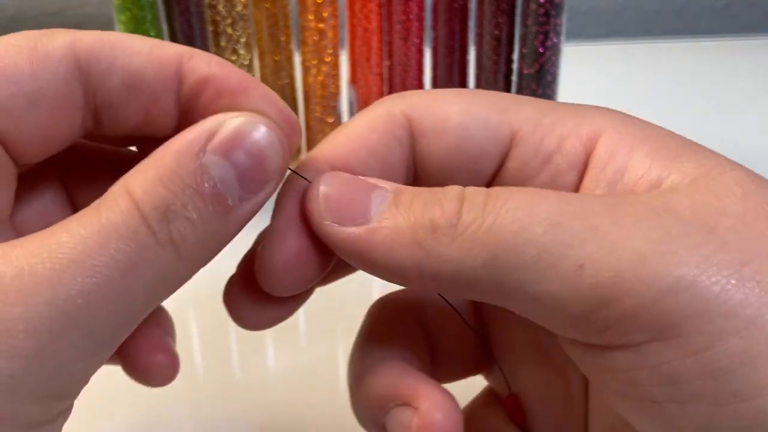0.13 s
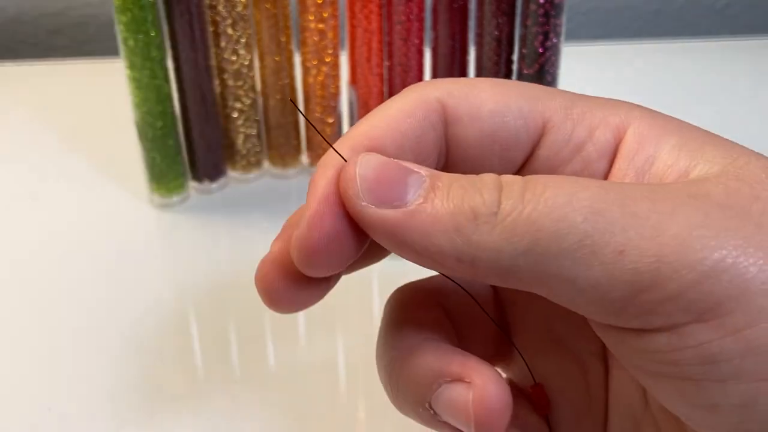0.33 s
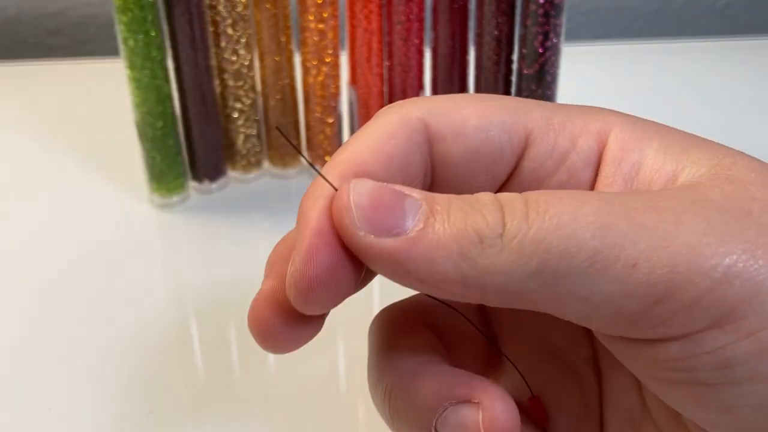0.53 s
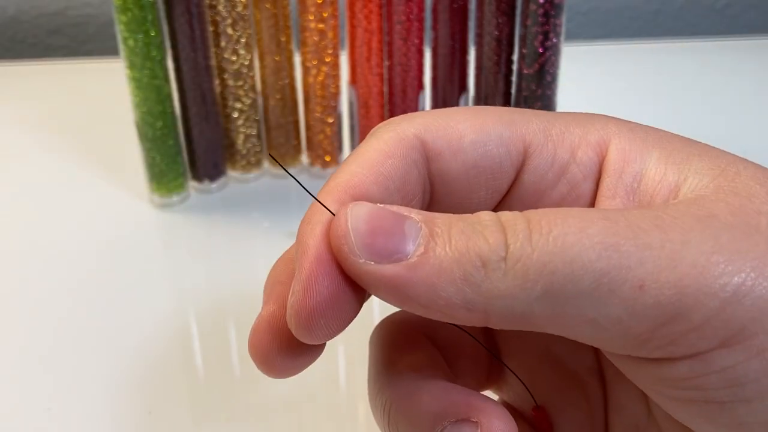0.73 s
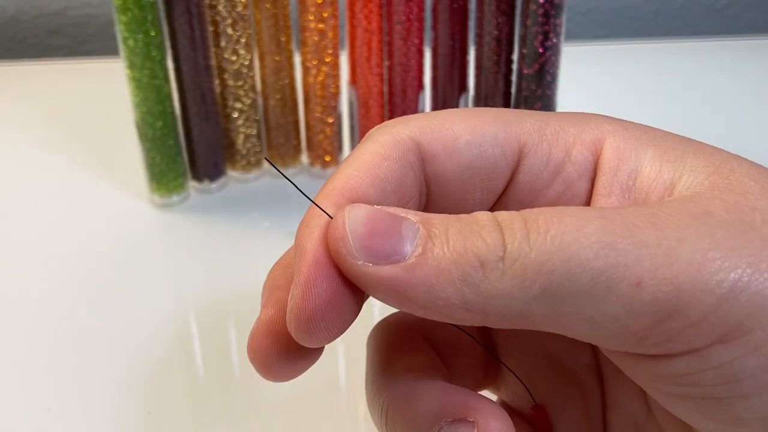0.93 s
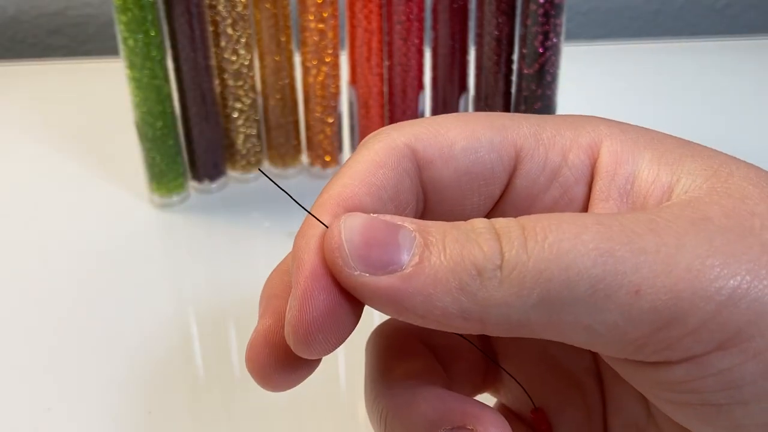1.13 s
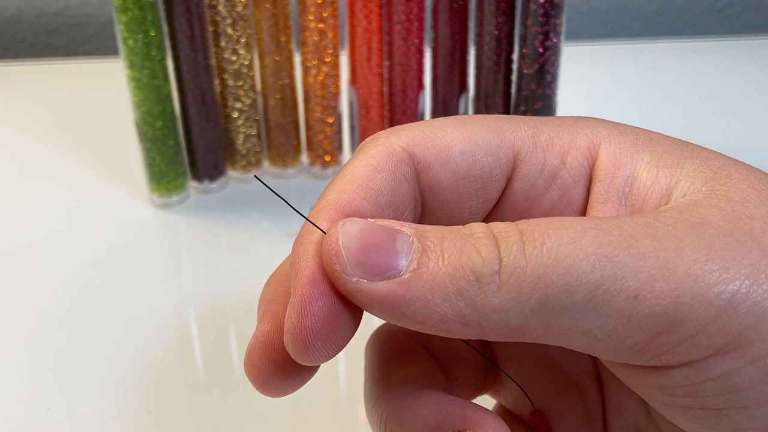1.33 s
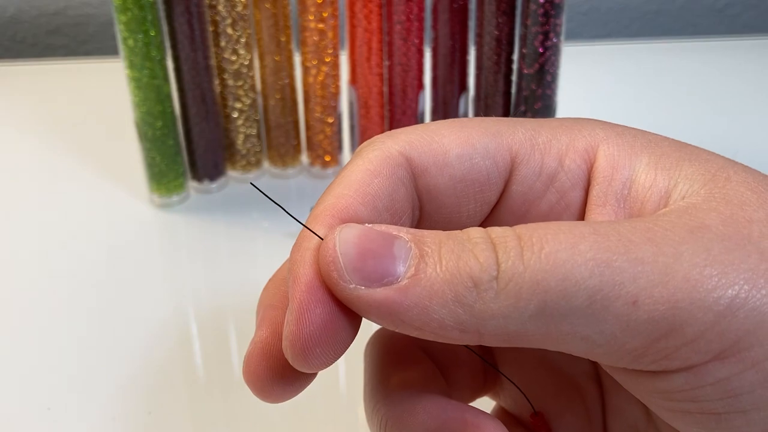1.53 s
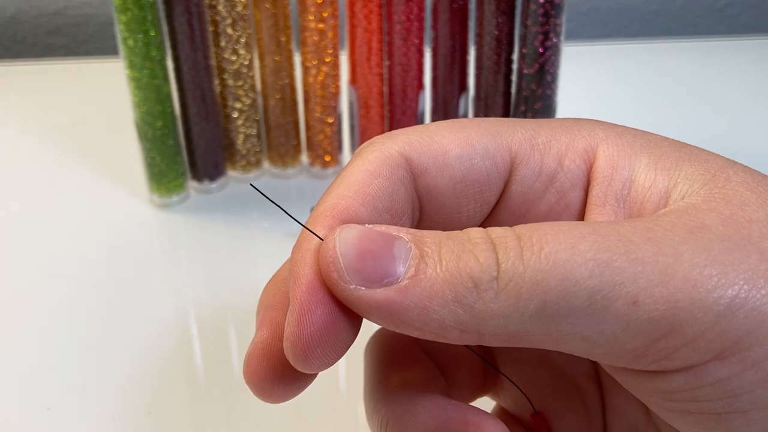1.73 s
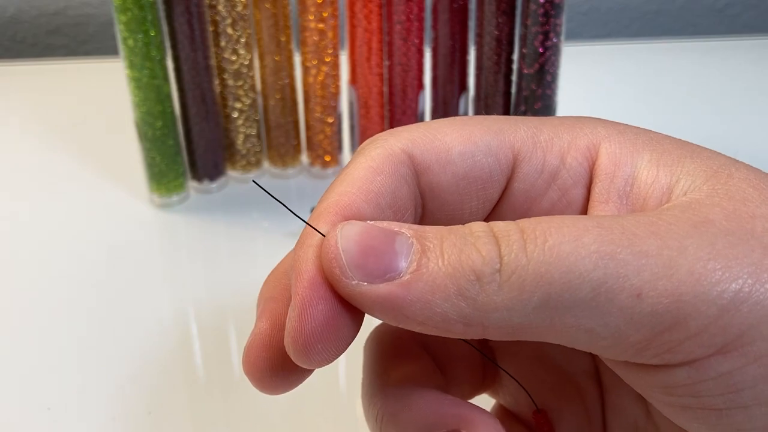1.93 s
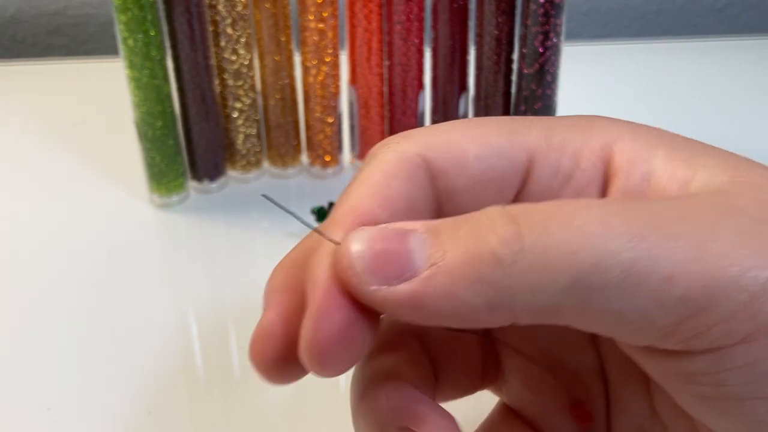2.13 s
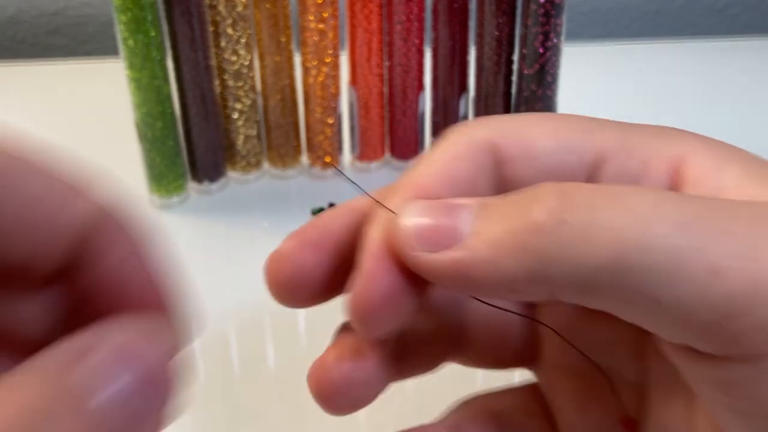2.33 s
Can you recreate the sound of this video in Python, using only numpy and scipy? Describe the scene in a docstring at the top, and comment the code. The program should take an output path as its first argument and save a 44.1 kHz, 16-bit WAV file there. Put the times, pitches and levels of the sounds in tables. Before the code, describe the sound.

Small glass beads clicking and sliding in a plastic tube, with skin brushing and table knocks.

```python
"""Small glass seed beads tick, slide and rattle in a plastic tube that is picked up, tapped and set down.
Each tick is a dry crack with a trace of glassy ring; sliding beads make a grainy fizz. Knocks ring the
tube and thump the table top. Skin brushes and catches on skin, a hand or the tube drags on the table,
and a quiet room hums. Two microphone ports share the bass; the left treble is delayed and inverted."""
import sys
import numpy as np
from scipy import signal
from scipy.fft import rfft, irfft, next_fast_len
from scipy.io import wavfile
from scipy.ndimage import uniform_filter1d

SR = 44100
rng = np.random.default_rng(int(sys.argv[2]) if len(sys.argv) > 2 else 0)


def to_wav(sig):
    """Store sig (one row per channel, or 1-D mono) as 16-bit WAV at the path in sys.argv[1].

    Samples outside -1..1 are clipped; the rate is SR.
    """
    pcm = np.clip(np.atleast_2d(sig), -1, 1) * 32767
    pcm = np.round(pcm).astype(np.int16)
    wavfile.write(sys.argv[1], SR, pcm.T)  # frames by channels


N = 108882
T = np.arange(N) / SR

# Colour of the room tone: (frequency [Hz], level [dB])
AIR_SPECTRUM = [(20, -11), (40, -6), (64, 0), (150, -17.5), (250, -19.5), (400, -21), (550, -27),
                (830, -28), (950, -28.5), (3000, -37), (6000, -41.5), (9000, -35), (16000, -49.5)]
# Reverb decay: (frequency [Hz], t60 [s])
ROOM_DECAY = [(200, 0.16), (2000, 0.19), (10000, 0.16)]
# Envelopes of low rubbing: two for the low body of the opening skin swish, then two drags on the table:
# (time [s], level [dB])
RUB_STROKES = [
    [(0.0, -76), (0.08, -72), (0.16, -84)],
    [(0.27, -82), (0.36, -69.5), (0.45, -74), (0.52, -90)],
    [(1.73, -93), (1.76, -81), (1.79, -66.5), (1.85, -51), (1.875, -64), (1.9, -102)],
    [(2.22, -91), (2.27, -58), (2.3, -42.5), (2.32, -40.5)],
]
# Colour of the low rubbing: (frequency [Hz], level [dB])
RUB_SPECTRUM = [(90, -42.5), (150, -2.5), (400, -9.5), (1000, -9), (2200, -16.5), (2900, -26.5),
                (5000, -27), (9000, -42)]
# One curve per skin stroke; only the first gets hiss:
# (time [s], level [dB], hiss offset [dB], centre [Hz], width [octaves])
SKIN_STROKES = [
    [(0.0, -51.5, -13.5, 2037, 0.63), (0.018, -55.5, 1, 2060, 0.57), (0.078, -54, -6.5, 2380, 0.74),
     (0.172, -67, -19.5, 1860, 0.36), (0.222, -64.5, -25, 1830, 0.38), (0.26, -74, 7.5, 2310, 0.34),
     (0.288, -55.5, 1.5, 2670, 0.52), (0.33, -51.5, 3, 1970, 0.56), (0.408, -46.5, -11, 2260, 1),
     (0.488, -62, 1, 1670, 1), (0.548, -100, 6, 1790, 0.12), (0.6, -96, 5, 2260, 0.62)],
    [(1.6, -100, 32, 3370, 0.5), (1.612, -88, 33, 3280, 0.59), (1.628, -68.5, 20, 3280, 0.76),
     (1.662, -76, 17, 2430, 1), (1.7, -114, 24, 2040, 0.45)],
    [(2.36, -84, -3, 1945, 0.63), (2.404, -66, 13, 1760, 1), (2.426, -58.5, -14, 2680, 0.94),
     (2.436, -54.5, 9, 3220, 1), (2.469, -50, 9, 3330, 0.94)],
]
# Colour of the skin hiss: (frequency [Hz], level [dB])
SKIN_HISS_SPECTRUM = [(2500, -37), (4000, -9.5), (6500, -2), (10000, 2), (12500, -1.5), (16000, -6.5)]
# Skin catching: (time [s], length [s], level [dB], centre [Hz], width [Hz])
SKIN_SQUEAKS = [(1.01, 0.091, -72, 2640, 510), (1.932, 0.055, -52.5, 3600, 180),
                (1.932, 0.028, -54.5, 4800, 320), (0.273, 0.23, -54.5, 1534, 58),
                (0.425, 0.11, -67.5, 1700, 69), (0.287, 0.14, -57.5, 1800, 52),
                (0.27, 0.2, -61.5, 2800, 58), (0.0, 0.14, -66, 3200, 190), (1.62, 0.058, -71, 1830, 470)]
# Table top modes: (frequency [Hz], level [dB], t60 [s])
TABLE_MODES = [(63.95, -6, 0.24), (81.4, -13, 0.15), (91.7, -1.5, 0.2), (107.4, -0.5, 0.16),
               (140.7, -3.5, 0.16), (213.5, -6, 0.23), (294.7, -3.5, 0.13), (349.2, 9.5, 0.061),
               (380, 0, 0.053), (516.3, -2.5, 0.051)]
# Plastic tube modes: (frequency [Hz], level [dB])
TUBE_MODES = [(560, -6.5), (775, -1.5), (915, -8.5), (1134, -0.5), (1540, 6), (1710, 0.5), (1830, 4),
              (2010, 1.5), (2260, -1.5), (2580, -11.5), (3280, 6.5), (3540, -8), (4060, -0.5), (4920, -9.5)]
# Blows on tube and table: (time [s], tube level [dB], tube centre [Hz], tube width [Hz],
# tube noise t60 [s], table level [dB], table bass tilt [dB per octave down], table rise [s])
KNOCK_HITS = [(1.4022, -18, 1140, 167, 0.047, -58, -5.5, 0.012),
              (1.406, -35, 670, 515, 0.12, -71, -7, 0.0057),
              (1.447, -50, 1150, 600, 0.056, -80, -12, 0.004),
              (1.783, -57, 700, 700, 0.054, -54.5, 1, 0.0061),
              (1.808, -44, 1776, 1180, 0.1, -60.5, -12, 0.0018),
              (1.933, -39.5, 2800, 3000, 0.45, -63, -9.5, 0.018),
              (1.948, -45.5, 650, 400, 0.061, -63, -4, 0.006),
              (1.964, -31, 700, 900, 0.12, -46, -15.5, 0.0046),
              (1.971, -11, 1830, 2500, 0.076, -29, -5, 0.004),
              (1.979, -12.5, 700, 800, 0.053, -38.5, -14.5, 0.0015),
              (2.016, -34, 900, 1200, 0.033, -50.5, -5, 0.0068),
              (2.304, -8, 1400, 1360, 0.049, -24, -1, 0.00925),
              (2.3072, -15.5, 1520, 1000, 0.021, -18.5, -3, 0.0035),
              (2.3135, -23, 1540, 1520, 0.047, -36.5, -1, 0.0022),
              (2.323, -68, 800, 800, 0.1, -30, 7.5, 0.0042)]
# Resonances of the bead-filled tube: (frequency [Hz], level [dB], t60 [s])
GLASS_MODES = [(3560, -2, .05), (4720, 6, 0.026), (6620, -11.5, 0.012), (7360, -4.5, 0.021),
               (8010, -5.5, 0.18), (10030, -0.5, 0.043), (11530, -9.5, .04), (12370, 2.5, 0.041),
               (14100, 0, 0.033)]
# Envelope of the sliding beads: (time [s], level [dB])
SLIDE_ENVELOPES = [
    [(1.34, -101), (1.375, -60), (1.41, -52.5), (1.45, -100), (1.49, -61.5), (1.54, -57.5), (1.6, -61.5),
     (1.63, -46.5), (1.66, -64.5), (1.69, -79), (1.76, -85), (1.82, -82), (1.9, -89), (1.93, -56.5),
     (1.96, -90), (1.975, -34), (2.03, -37.5), (2.06, -50.5), (2.12, -61.5), (2.135, -72), (2.19, -58),
     (2.24, -69), (2.3, -54.5), (2.36, -56.5), (2.42, -43), (2.47, -44)],
]
# Colour of their fizz: (frequency [Hz], level [dB])
SLIDE_SPECTRUM = [(3000, -36), (5400, -22), (6500, -4), (7700, 0), (10000, -3), (12500, -3), (16000, -6)]
# Bead impacts: (time [s], level [dB], crack t60 [s], centre [Hz])
BEAD_TICKS = [(0.2117, -28, 0.0055, 12500), (0.9045, -40, 0.029, 10200), (1.1187, -46, 0.023, 11200),
              (1.3745, -67, 0.026, 8400), (1.4057, -26, 0.06, 8700), (1.413, -18.5, 0.026, 10200),
              (1.4152, -22, 0.031, 10700), (1.42, -52, 0.022, 9380), (1.4225, -33, 0.016, 8600),
              (1.543, -44, 0.075, 10800), (1.561, -30.5, 0.012, 11100), (1.5736, -42, 0.015, 9400),
              (1.5872, -26, 0.019, 10400), (1.627, -57, 0.042, 7500), (1.641, -34.5, 0.044, 7600),
              (1.717, -47.5, 0.04, 8150), (1.7847, -50, 0.033, 7360), (1.8072, -29.5, .025, 4760),
              (1.9668, -23, 0.27, 7000), (1.9705, -2.5, 0.0155, 5150), (1.9711, 1.5, 0.0094, 11110),
              (1.972, -4, 0.024, 5560), (1.994, -11, 0.068, 11000), (1.999, -6.5, 0.022, 9000),
              (2.006, -10, 0.042, 11000), (2.0298, -17.5, 0.053, 11400), (2.062, -26, 0.035, 9100),
              (2.087, -16, 0.027, 9170), (2.1027, -23, 0.036, 9740), (2.108, -24.5, 0.018, 9770),
              (2.1105, -37.5, 0.027, 10500), (2.139, -48, .015, 10600), (2.1534, -29, 0.039, 10300),
              (2.1546, -20.5, 0.024, 11400), (2.156, -30.5, 0.012, 11000), (2.1774, -34.5, .03, 11500),
              (2.1785, -30.5, 0.024, 12400), (2.3073, -39, 0.017, 3520)]


def amp(db):
    """dB to gain."""
    return 10 ** (np.asarray(db) / 20)


def unit(x):
    """Normalise to rms 1."""
    return x / np.sqrt(np.mean(x ** 2) + 1e-20)


def along(points, hz):
    """Read a (frequency, value) curve on a log frequency axis."""
    f, v = np.transpose(points)
    return np.interp(np.log(hz + 1), np.log(f + 1), v)


def peak(f, hz, width_hz):
    """Response at f of one resonance centred on hz."""
    return 1j * f * width_hz / (hz ** 2 - f * f + 1j * f * width_hz)


def filtered(x, response):
    """EQ x with a complex frequency response."""
    m = next_fast_len(x.shape[-1] + 8192)
    return irfft(rfft(x, m) * response(np.fft.rfftfreq(m, 1 / SR)), m)[..., :x.shape[-1]]


def fader(strokes, db_cols=(1,)):
    """Gain ride from the strokes' summed dB columns, silent between strokes."""
    return sum(amp(np.interp(T, rows[:, 0], rows[:, db_cols].sum(1), left=-120, right=-120))
               for rows in map(np.array, strokes))


def grit(spectrum, grainy_db, grain_s):
    """Stereo noise of rms 1, roughened by tiny uneven grains."""
    grains = uniform_filter1d(rng.exponential(size=N), max(1, int(grain_s * SR)))
    noise = rng.standard_normal((2, N)) * amp(grainy_db * unit(grains - grains.mean()))
    return unit(filtered(noise, lambda f: amp(along(spectrum, f)) * (f > spectrum[0][0])))


def ring(hz, db, t60, t, spread_db):
    """Damped modes, with their own level and phase at each port."""
    level = db[:, None] + spread_db * rng.standard_normal((2, len(hz), 1)) - 60 * t / t60[:, None]
    cycles = hz[:, None] * t + rng.random((2, len(hz), 1))
    return (amp(level) * np.sin(2 * np.pi * cycles)).sum(1)


def add(track, start_s, sound):
    """Mix a sound in at start_s."""
    i = round(start_s * SR)
    track[:, i:i + sound.shape[1]] += sound[:, :N - i]


def room_tone(hum_hz=60.6, hum_width_hz=5.3, tone_hz=830):
    """The bed: soft air, a fuzzy mains hum and a faint steady tone."""
    air = grit(AIR_SPECTRUM, grainy_db=0.4, grain_s=0.03)
    hum = unit(filtered(rng.standard_normal(N), lambda f: 1 / (1 + ((f - hum_hz) / hum_width_hz) ** 2)))
    return amp(-69.5) * air + amp(-64) * hum + amp(-90.5) * np.sin(2 * np.pi * tone_hz * T)


def room_reverb(x):
    """A short room tail in which each frequency dies at its own speed."""
    hz, t, spectra = signal.stft(rng.standard_normal((2, SR // 3)), SR, nperseg=256)
    decay = amp(-60 * t / along(ROOM_DECAY, hz)[:, None])
    tail = signal.istft(spectra * decay, SR, nperseg=256)[1]
    predelayed = np.pad(x, ((0, 0), (300, 0)))
    return signal.fftconvolve(predelayed, tail / np.linalg.norm(tail[0]), axes=1)[:, :N]


def low_rub():
    """Low, grainy friction: the body of the opening skin swish, then hand or tube dragging on the table."""
    return fader(RUB_STROKES) * grit(RUB_SPECTRUM, grainy_db=2, grain_s=0.004)


def skin_brush(patchy_db=2.0):
    """Skin on skin: patchy friction noise in a sweeping band, with hiss on the first stroke."""
    times, _, _, centres, widths = np.concatenate(SKIN_STROKES).T
    hz, t, spectra = signal.stft(rng.standard_normal((2, N)), SR, nperseg=512)
    offset = np.log2((hz[:, None] + 1) / np.interp(t, times, centres)) / np.interp(t, times, widths)
    band = np.exp(-(offset * np.where(offset < 0, 1.4, 1)) ** 2 / 2)  # steeper on the low side
    patches = uniform_filter1d(rng.standard_normal(spectra.shape[1:]), size=9, axis=1)
    gain = amp(patchy_db * unit(patches)) * band
    gain /= np.sqrt(np.mean(gain ** 2, axis=0))  # level holds through the sweep
    body = signal.istft(spectra * gain, SR, nperseg=512)[1][:, :N]
    hiss = grit(SKIN_HISS_SPECTRUM, grainy_db=0.5, grain_s=0.0027)
    return fader(SKIN_STROKES) * body + fader(SKIN_STROKES[:1], db_cols=(1, 2)) * hiss


def skin_squeaks():
    """Skin catches briefly, and one fuzzy resonance swells and fades."""
    out = np.zeros((2, N))
    for start, length, db, hz, width_hz in SKIN_SQUEAKS:
        band = unit(filtered(rng.standard_normal((2, N)), lambda f: peak(f, hz, width_hz) ** 2))
        out += amp(db) * band * np.sin(np.pi * np.clip((T - start) / length, 0, 1))
    return out


def knocks():
    """A blow rings the plastic tube around its centre pitch and thumps the table top."""
    out, t = np.zeros((2, N)), np.arange(SR // 2) / SR
    mode_hz, mode_db = np.transpose(TUBE_MODES)
    for start, tube_db, centre_hz, width_hz, t60, table_db, tilt_db, rise in KNOCK_HITS:
        modes = ring(mode_hz, mode_db, 0.6 * t60 * np.sqrt(1000 / mode_hz), t, spread_db=3)
        clack = amp(-60 * t / t60) * rng.standard_normal((2, len(t)))
        band = lambda f: peak(f, centre_hz, width_hz) * peak(f, centre_hz, 3 * width_hz)
        tube = filtered(0.35 * modes + clack, band)
        tube *= 1 - np.exp(-t / (0.27 * rise))  # the tube speaks faster than the table
        thump = sum(amp(db + tilt_db * np.log2(350 / hz) - 60 * t / decay) * np.sin(2 * np.pi * hz * t)
                    for hz, db, decay in TABLE_MODES)
        thump *= 1 - np.exp(-(t / rise) ** 2)
        add(out, start, amp(tube_db) * tube + amp(table_db) * thump)
    return out


def glassy(x, spread_db, direct=1.23, colour=1.3):
    """Colour x with the resonances of the bead-filled tube, each at a randomised level."""
    gains = colour * amp(spread_db * rng.standard_normal(len(GLASS_MODES)))
    return filtered(x, lambda f: direct + sum(gain * amp(db) * peak(f, hz, width_hz=350)
                                              for gain, (hz, db, _) in zip(gains, GLASS_MODES)))


def bead_slide():
    """Beads sliding in the tube blur into a glassy fizz."""
    fizz = grit(SLIDE_SPECTRUM, grainy_db=2.5, grain_s=0.002)
    return fader(SLIDE_ENVELOPES) * unit(glassy(fizz, spread_db=1))


def bead_ticks(rise_s=0.00024, ring_db=-27):
    """Each bead impact is a dry crack with a trace of glassy ring, band-passed around its centre."""
    out, t = np.zeros((2, N)), np.arange(SR // 8) / SR
    mode_hz, mode_db, mode_t60 = np.transpose(GLASS_MODES)
    for start, db, t60, centre_hz in BEAD_TICKS:
        envelope = amp(-60 * t / t60) * (1 - np.exp(-t / rise_s))
        crack = glassy(envelope * rng.standard_normal((2, len(t))), spread_db=4)
        tick = crack + amp(ring_db) * ring(mode_hz, mode_db, mode_t60, t, spread_db=3)
        low_cut = lambda f: (1j * f / (0.5 * centre_hz + 1j * f)) ** 6
        high_cut = lambda f: 1 / (1 + 1j * f / (2 * centre_hz)) ** 4
        band = lambda f: peak(f, centre_hz, 1.3 * centre_hz) ** 2 * low_cut(f) * high_cut(f)
        add(out, start, amp(db) * filtered(tick, band))
    return out


def scene():
    """Beads, knocks and hands up close, with a little reverb over the room tone."""
    close = bead_ticks() + bead_slide() + knocks() + low_rub() + skin_brush() + skin_squeaks()
    return close + amp(-9) * room_reverb(close) + room_tone()


def record(dry, bass_lead_s=0.0005, treble_lag_s=1 / 4600):
    """Two ports: shared bass with the left early, separate mids, shared treble with the left late."""
    bass = lambda f: 1 / (1 + (f / 900) ** 4)  # share of the power
    treble = lambda f: np.clip((f - 5800) / 1000, 0, 1)
    lean_left = lambda db: amp([[db], [-db]])
    mids = filtered(dry, lambda f: np.sqrt(np.clip(1 - bass(f) - treble(f), 0, 1)) * lean_left(2.3))
    bass_pan = lambda f: lean_left(0.6) * np.exp([[1j], [-1j]] * f * np.pi * bass_lead_s)
    # the left treble is also inverted
    treble_pan = lambda f: np.array([-np.exp(-2j * np.pi * f * treble_lag_s), np.ones_like(f)])
    shared = filtered(dry[0], lambda f: np.sqrt(bass(f)) * bass_pan(f)
                      + np.sqrt(treble(f)) * treble_pan(f))
    high_cut = lambda f: np.sin(np.pi / 2 * np.clip((16100 - f) / 500, 0, 1)) ** 2
    low_cut = lambda f: (1j * f / (30 + 1j * f)) ** 6
    return filtered(mids + shared, lambda f: high_cut(f) * low_cut(f))


dry = scene()
out = record(dry)
to_wav(out)
```